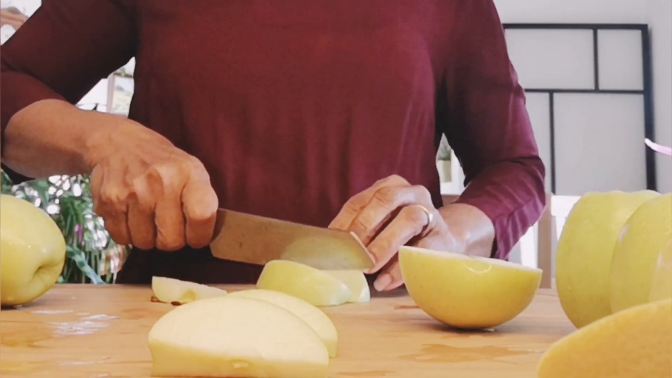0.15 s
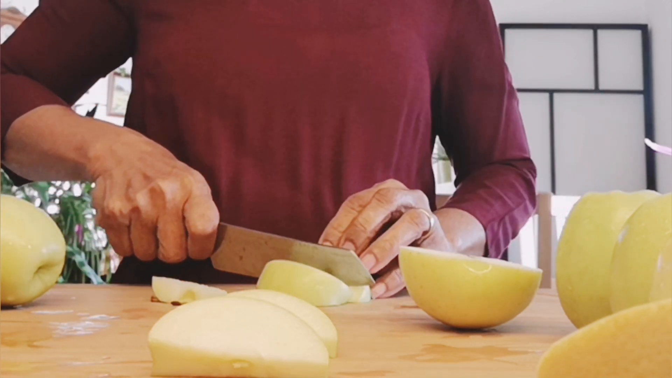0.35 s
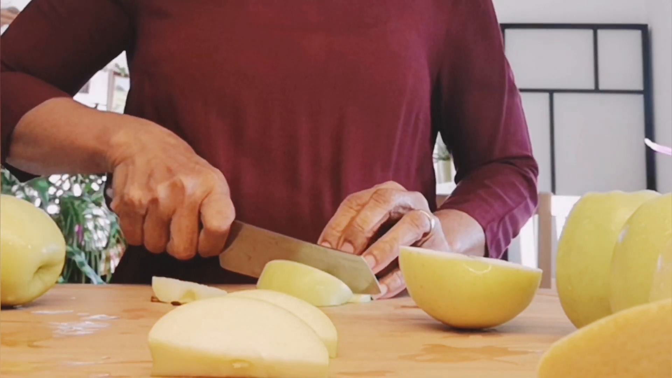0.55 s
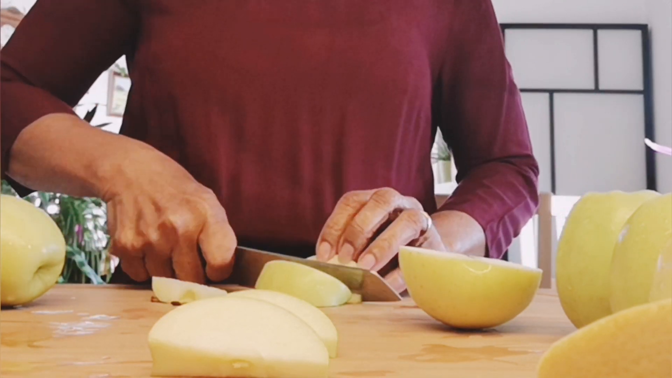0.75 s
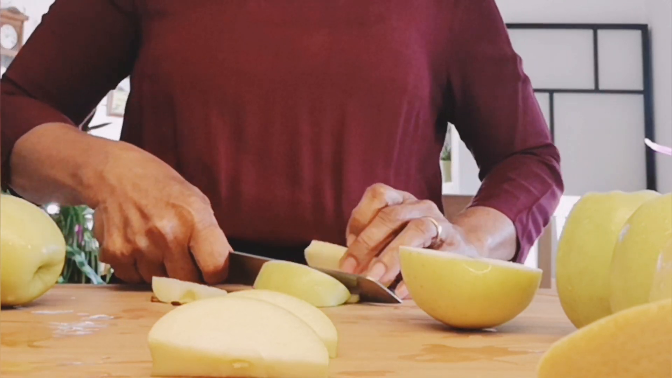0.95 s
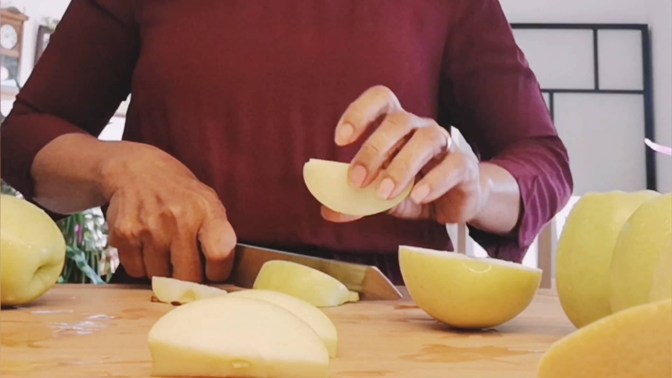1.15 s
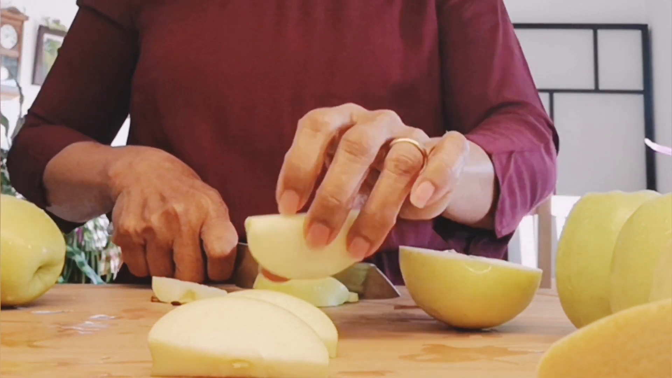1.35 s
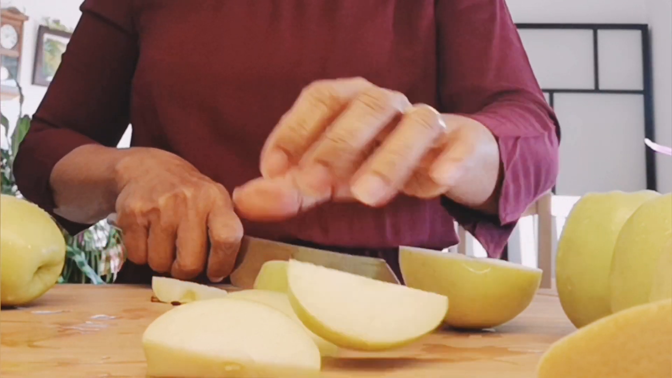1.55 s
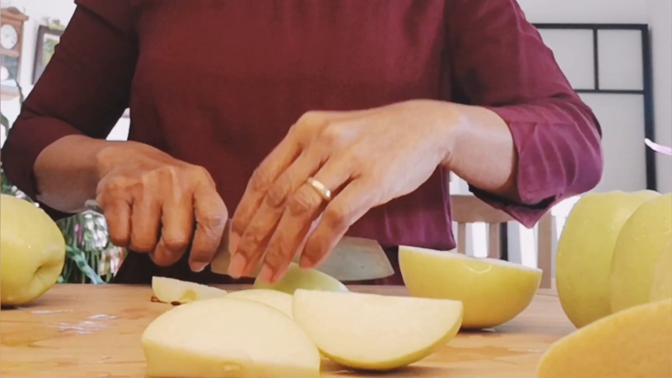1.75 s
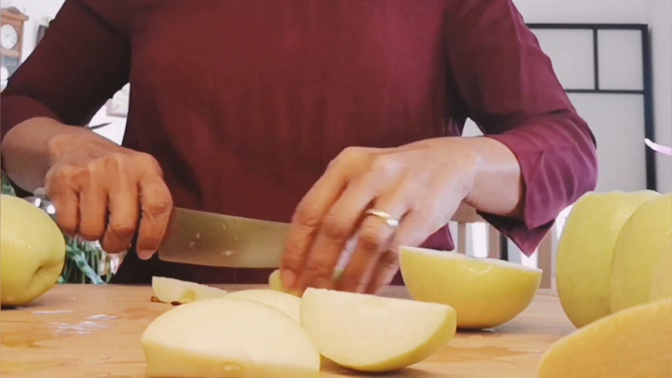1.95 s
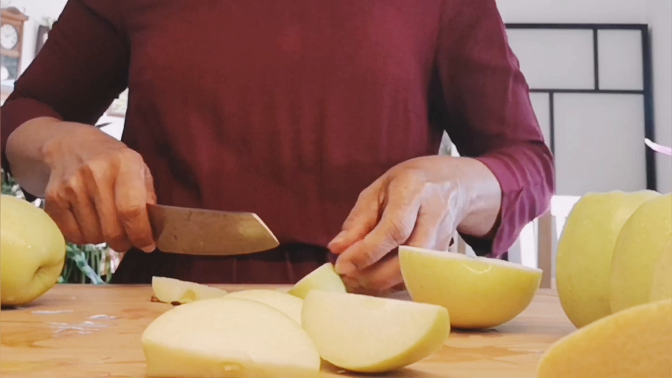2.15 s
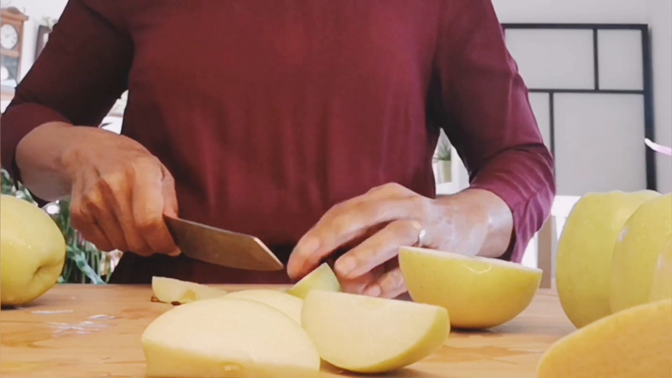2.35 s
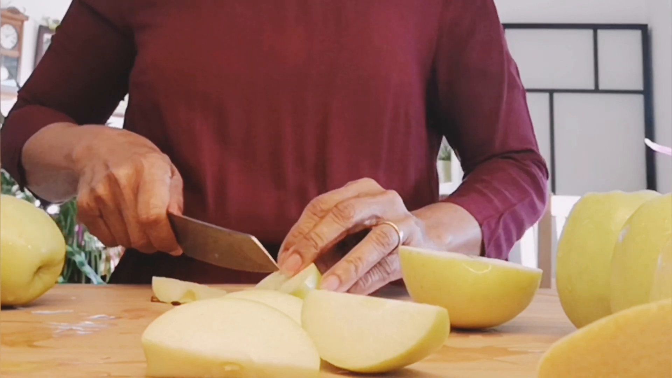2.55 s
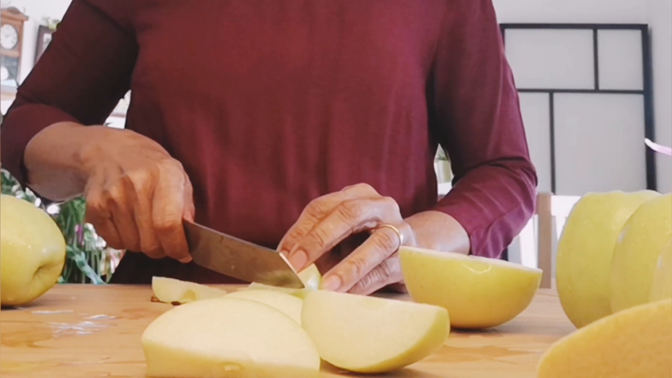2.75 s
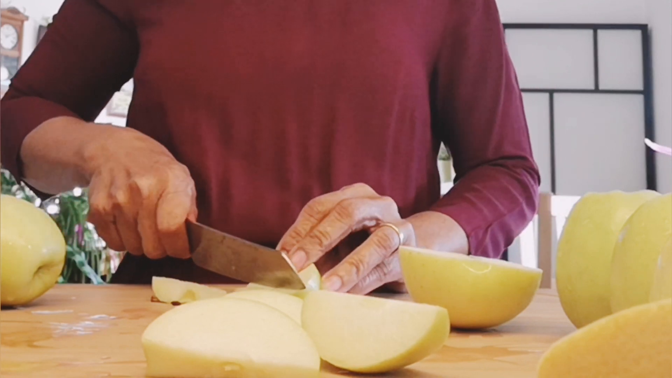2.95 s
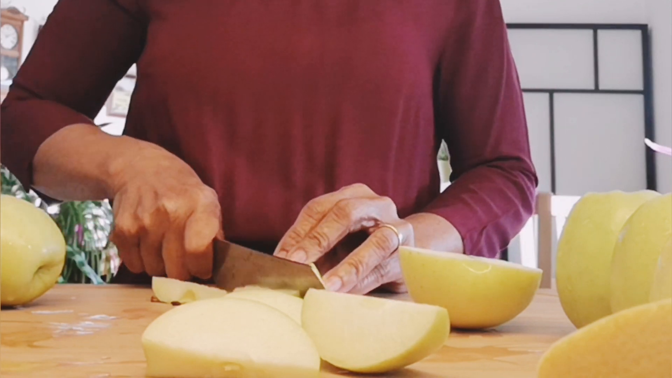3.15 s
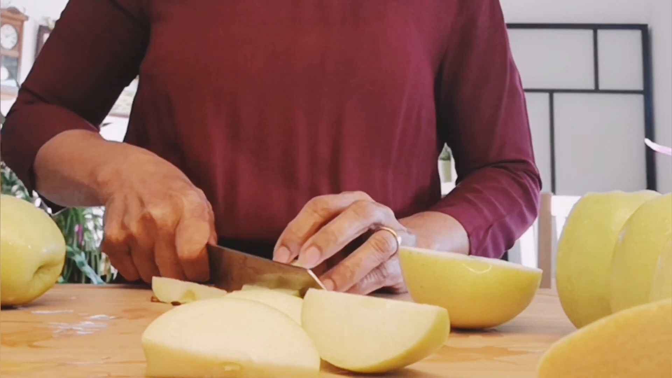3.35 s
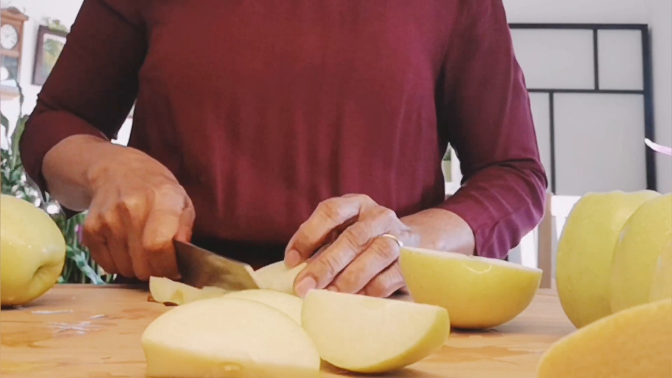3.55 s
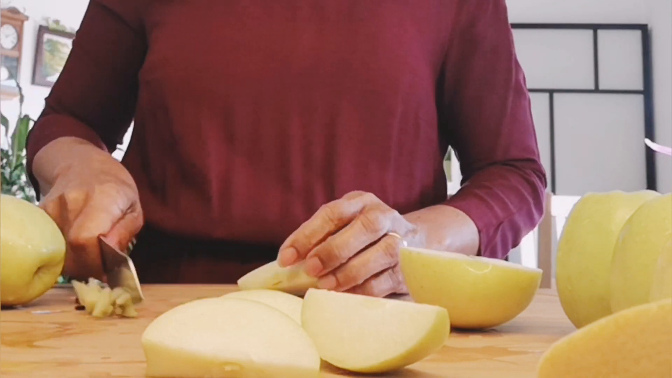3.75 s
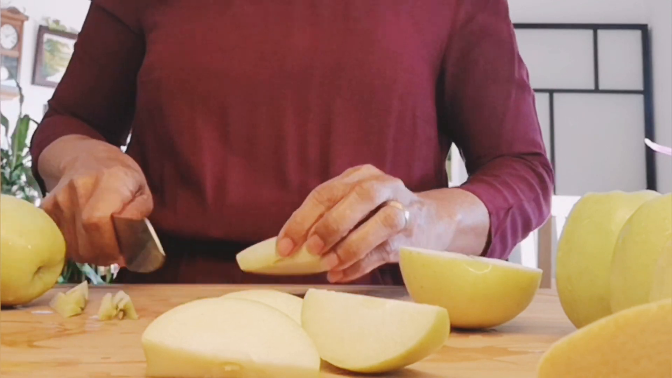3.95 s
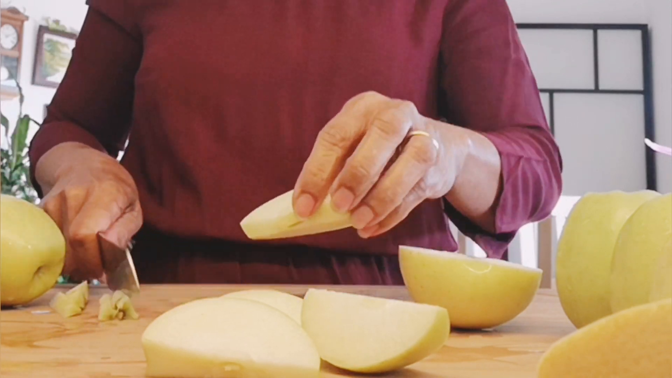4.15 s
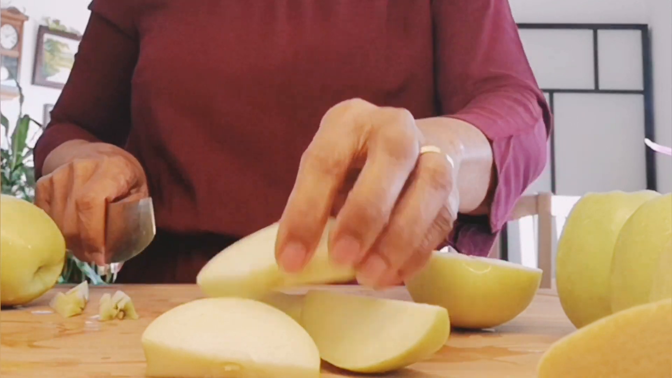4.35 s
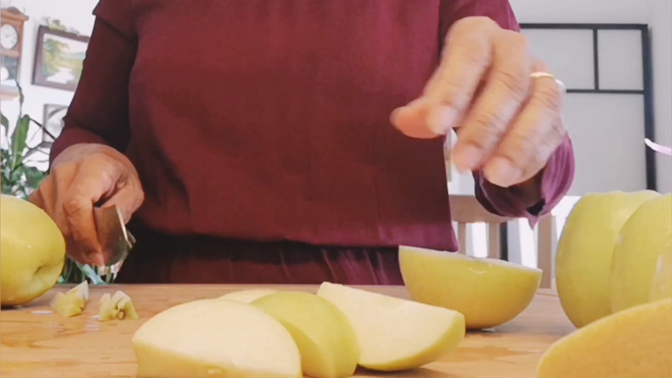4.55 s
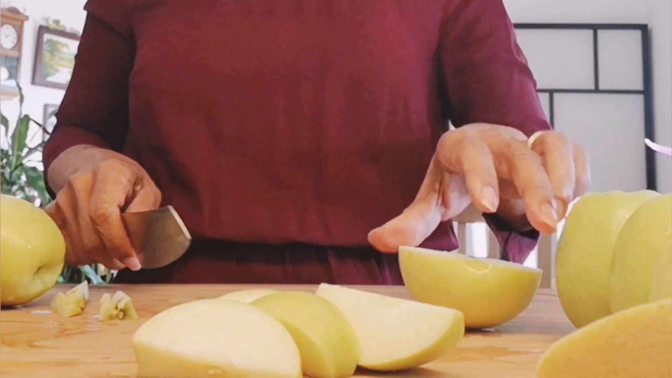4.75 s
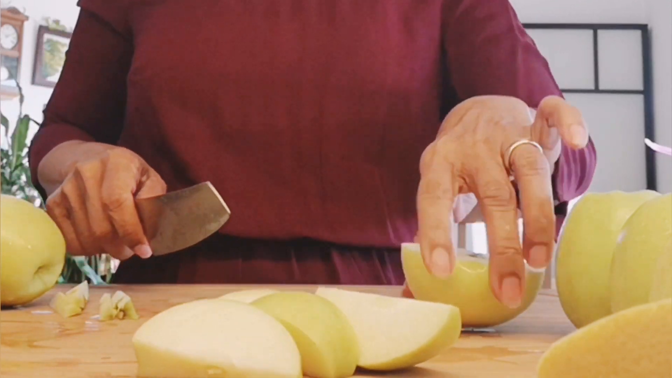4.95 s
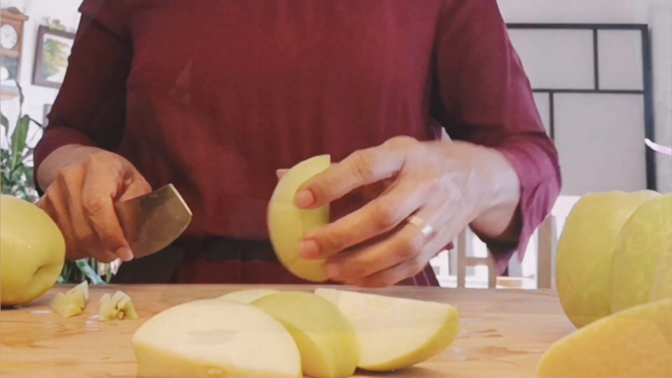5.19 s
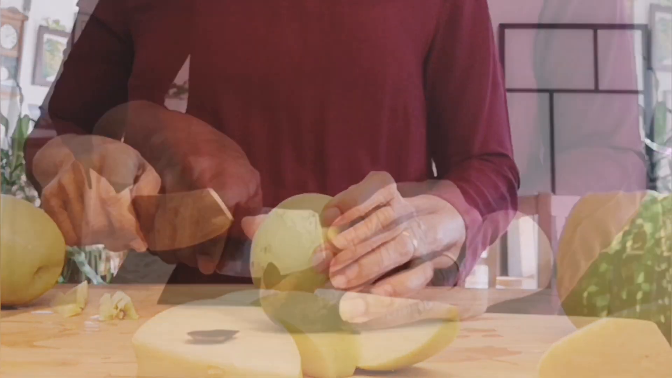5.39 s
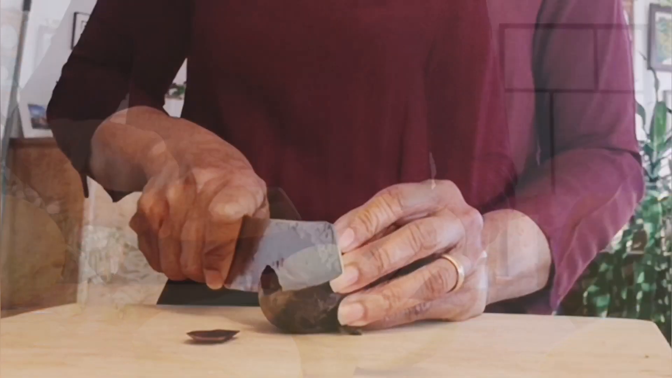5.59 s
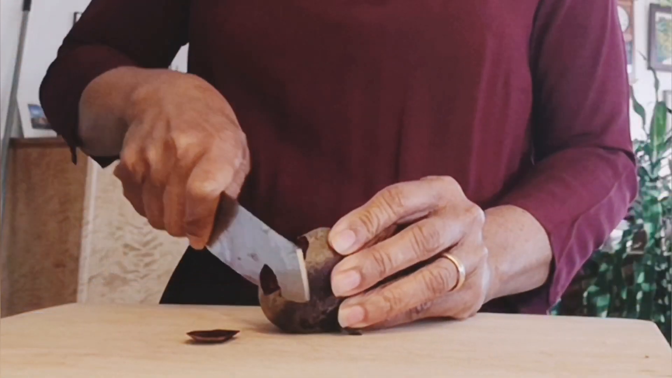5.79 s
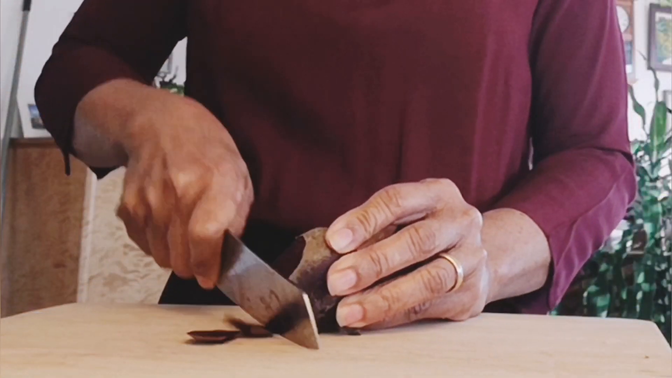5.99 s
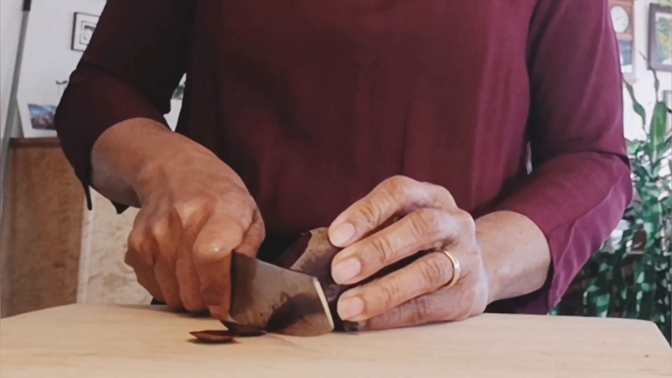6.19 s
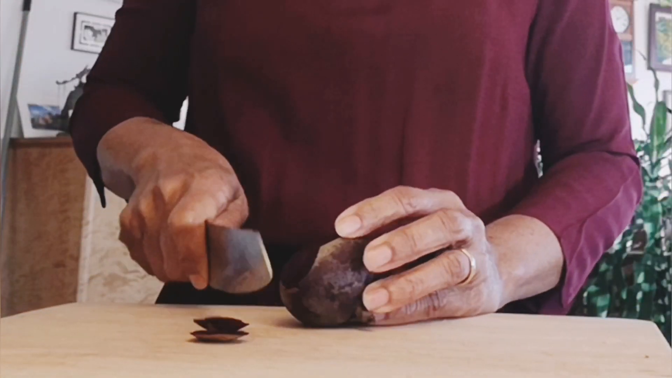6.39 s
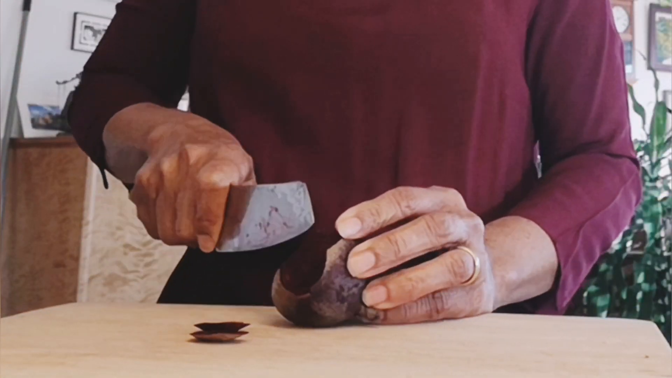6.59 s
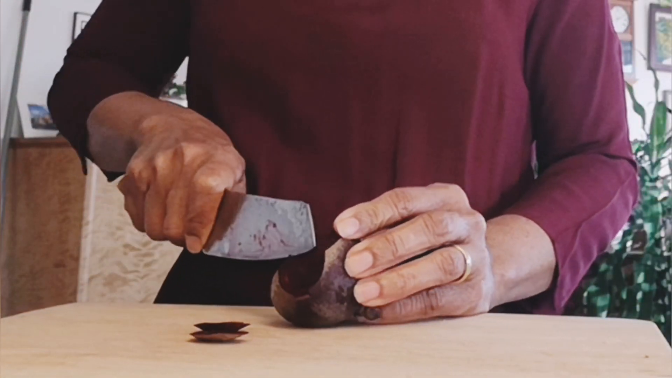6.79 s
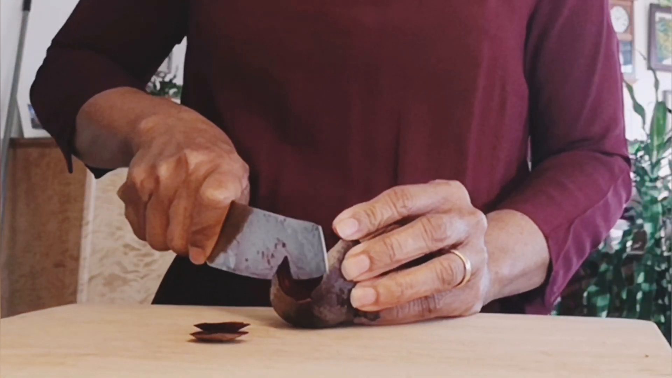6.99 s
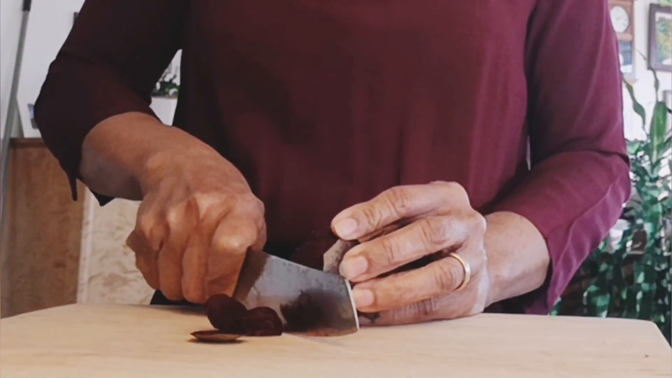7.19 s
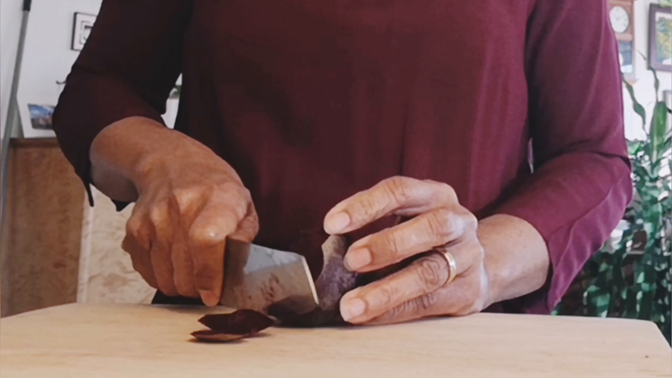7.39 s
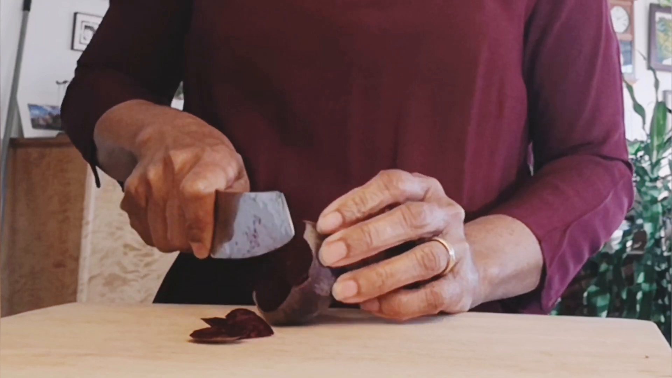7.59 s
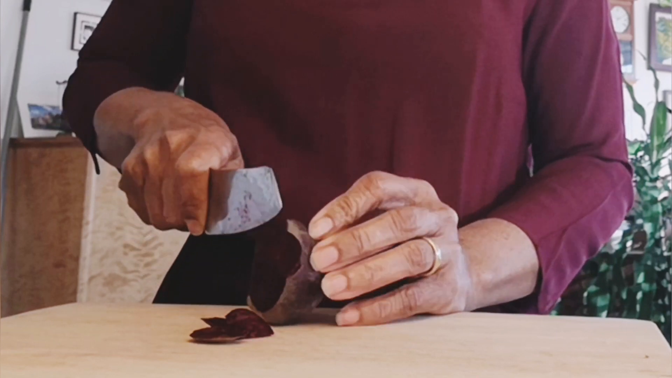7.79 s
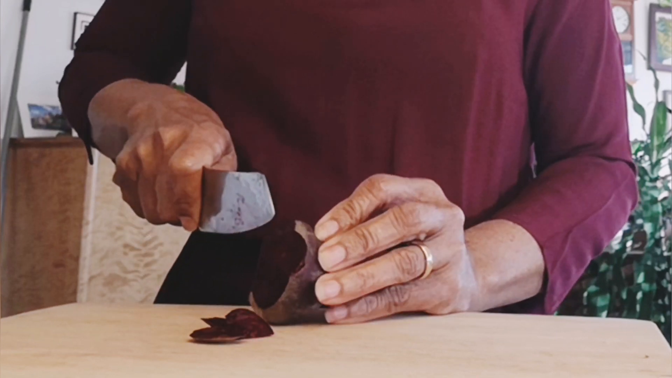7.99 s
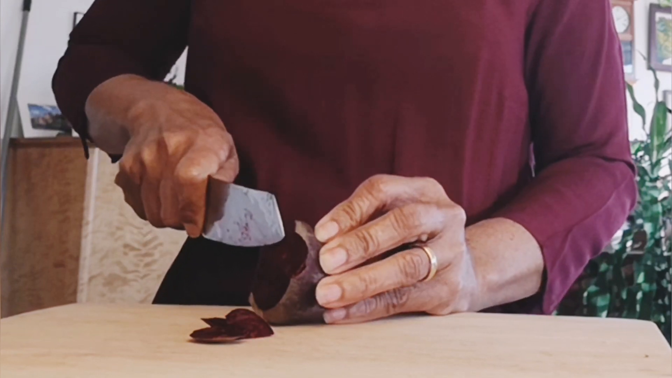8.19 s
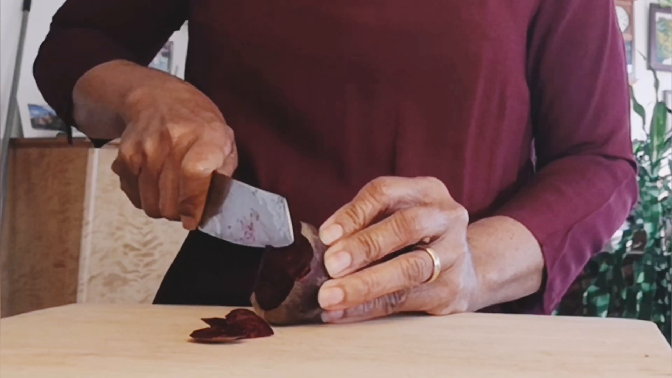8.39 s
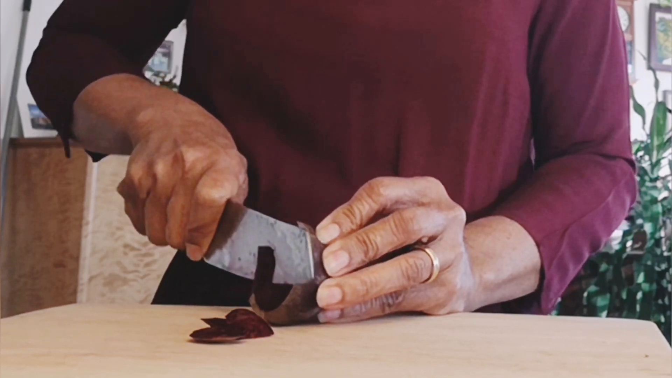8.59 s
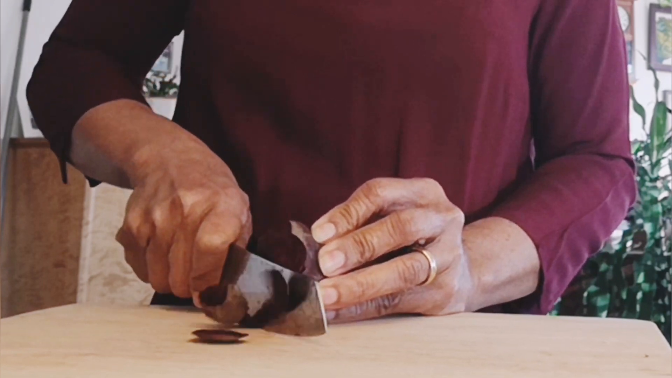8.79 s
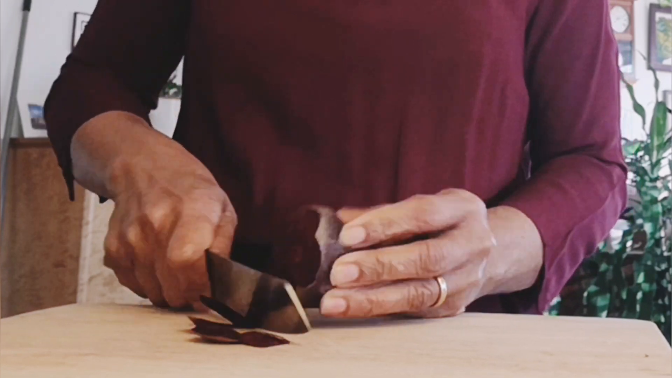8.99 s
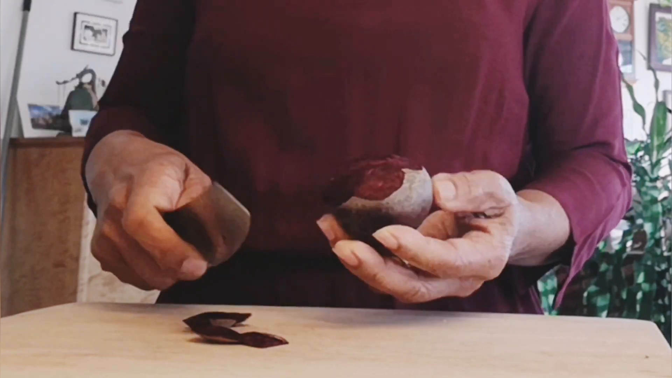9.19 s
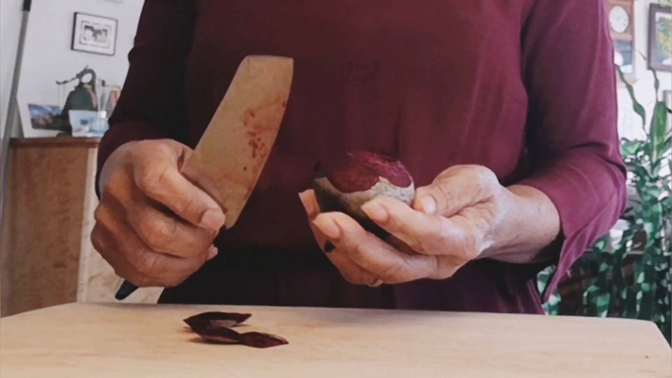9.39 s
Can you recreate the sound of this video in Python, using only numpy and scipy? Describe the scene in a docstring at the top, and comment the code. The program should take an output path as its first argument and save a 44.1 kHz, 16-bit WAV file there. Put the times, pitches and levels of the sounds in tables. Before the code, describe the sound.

Apple slicing comes first: a juicy crackling cut, a double knock on wood, a cluster of dull wobbling bumps as the slice is set down, light scrapes, then another cut with a loud crack. After small knocks and a put-down thud, the work moves to a beet, with three spaced paring strokes and firm, brighter clacks. Two close microphones catch short room echo, soft low air noise and a faint high whine.

```python
"""Apple and beet on two wooden boards

Indoors in a quiet kitchen, close to the work: an apple is sliced, then a beet is pared on another board.
The blade hisses as a crackle of bursting cells, and each cut swells toward the board.
Knocks, snaps, bumps and light touches are short rings of shaped noise; boards, blade and table add modes.
Two spaced microphones hear room echo, air noise, a low hum and a faint electric whine of falling chirps;
a compressor holds the hardest knocks."""
import sys
import numpy as np
from scipy import signal
from scipy.fft import rfft, irfft
from scipy.io import wavfile
from scipy.ndimage import uniform_filter1d, minimum_filter1d

SR = 44100
rng = np.random.default_rng(int(sys.argv[2]) if len(sys.argv) > 2 else 0)


def dump_mix(stems):
    """Bounce the given channels to the path in sys.argv[1] as a 16-bit WAV at rate SR."""
    frames = np.atleast_2d(stems).T  # one column per channel
    limited = np.clip(frames, -1, 1)  # hard clip at full scale
    pcm = np.round(limited * 32767).astype(np.int16)
    wavfile.write(sys.argv[1], SR, pcm)


N = 416304
TIME = np.arange(N) / SR  # seconds
HZ = np.fft.rfftfreq(8192, 1 / SR)  # frequency axis of a single blow
MOVE_S = 5.5  # the work moves from the apple board to the beet board

# the edge pushed through the fruit; end levels are before the layer gains:
# [start_s, length_s, end_hiss_db, end_judder_db, swell_db]
CUTS = [(0.482, 0.231, -45, -38, 31), (3.06, .172, -50, -44, 26.5), (4.489, 0.077, -59.5, -37, 14.5),
        (5.995, .1, -58.5, -46.5, 19), (6.993, .26, -62.5, -40, 12), (8.577, 0.34, -55, -37, 6.5)]
BITE_S, CUT_EDGE_S = 0.058, 0.01  # fades as the edge enters the skin and as the cut stops
SWELL_POWER = 1.9  # the level in dB climbs as this power of the way through
# the blade dragged over wood or fruit; levels are before the layer gains:
# [middle_s, length_s, hiss_db, judder_db]
SCRAPES = [(2.061, 0.22, -60, -51), (2.244, 0.088, -67.5, -67), (2.4, 0.081, -76, -69.5),
           (2.599, 0.29, -73.5, -68), (3.571, 0.057, -51, -52.5), (3.8, .2, -74.5, -74),
           (4.247, 0.15, -59.5, -40.5), (5.924, 0.14, -77.5, -66), (6.346, 0.21, -58.5, -48.5),
           (7.076, 0.071, -67, -38), (8.696, 0.097, -61.5, -36)]
SCRAPE_ARCH = 1.5  # level follows blade speed, half a sine, to this power
CELLS_PER_S, CELL_SPREAD_DB = 3500, 1.9  # rate of bursting cells, mean of their exponential spread
# crackle of the flesh: [pitch_hz, density_db]
FLESH = [(200, -15.5), (700, 2), (1250, 0.5), (2000, 4), (3200, 0.5), (4800, 0), (6200, -3), (7200, 3.5),
         (7900, -6.5), (8600, -12.5), (10000, -22), (11500, -19), (15000, -23)]
# low shaking of the board under the drag: [pitch_hz, density_db]
JUDDER = [(40, -22.5), (100, -7), (165, 10), (210, -10.5), (280, -19), (360, -5), (500, -13), (650, -33.5),
          (2000, -75)]
# band in which the apple board hums under the blade: [pitch_hz, density_db]
PRESSED_BOARD = [(900, -25), (1150, -1), (1300, 1), (1550, -6), (1900, -31)]
# modes of the free blade: [pitch_hz, level_db, t60_s]
BLADE = [(7500, -3.5, 0.01), (7620, -3.5, 0.11), (8090, 2.5, 0.032), (7500, -7, 0.024)]
# modes of the blade while it drags: [pitch_hz, level_db, t60_s]
DRAGGED_BLADE = [(1110, 6.5, 0.019), (1427, 4, 0.018), (3040, -1.5, 0.018), (3400, -1.5, 0.019),
                 (5270, -4.5, .02), (5960, -15, .02), (7580, -6.5, 0.06)]

# blade meets board; the thump is relative to the clack, before it is halved; + is left:
# [start_s, force_db, hardness_corner_hz, thump_db, left_right_db]
KNOCKS = [(0.7122, -11.5, 1300, -1, -2), (0.7352, -13.5, 1450, -6, 0), (3.2289, -23, 1900, 6.5, -2),
          (3.2727, 8.5, 1950, -16, 0), (4.052, -44.5, 1570, 10, 0.5), (4.1934, -12.5, 1790, -1.5, 1),
          (4.5855, -21, 910, -4, -2), (6.0946, 3.5, 4100, -16.5, 3), (6.227, -26, 3900, 14, -2),
          (7.2552, 6, 2650, -9.5, 1.5), (8.362, -45, 1890, 15, 5.5), (8.857, 1, 2450, -3, 2.5)]
# clack on either board: [pitch_hz, density_db]
APPLE_BOARD = [(60, -38), (250, -20.5), (400, -7), (620, -11), (760, -7.5), (900, -8), (1080, 2),
               (1280, 1.5), (1650, -7), (2500, -1.5), (3200, -5), (4200, -10.5), (7500, 0), (10000, -19)]
BEET_BOARD = [(60, -51.5), (320, -14.5), (520, -12), (700, -5.5), (950, 2), (1160, -0.5), (1350, -5),
              (1650, -3), (1900, -4.5), (2350, -7.5), (3550, -10.5), (4100, -22), (7500, -12.5),
              (10000, -15)]
# thump of the table under a knock: [pitch_hz, density_db]
THUMP = [(30, -37), (80, -11.5), (130, 2), (185, 0), (260, -20.5), (500, -23), (2000, -65)]
# modes of the two boards: [pitch_hz, level_db, t60_s]
APPLE_MODES = [(295, -6.5, 0.081), (428, -6, 0.057), (540, -10, 0.039), (682, -2.5, 0.1), (877.5, 0, 0.12),
               (1215, -1, .05), (1381.5, -3, 0.045), (1997, -3.5, .05), (3022, -7, .05)]
BEET_MODES = [(424, -10.5, 0.12), (485, -25, .08), (645, -5.5, 0.14), (910, -4.5, 0.066),
              (1183, 24.5, 0.0097), (1938, 4.5, 0.076), (2460, 19, 0.033), (2864, 6, 0.11),
              (2980, -14, 0.16), (3690, 2.5, 0.074)]

# skin and fibres snap: [start_s, level_db, t60_s, brightness_corner_hz, left_right_db]
SNAPS = [(0.734, -16.5, 0.022, 6040, 0), (3.2275, -22.5, 0.11, 12000, -2), (3.2553, -27, 0.039, 9000, -6.5),
         (3.2595, -11.5, 0.01, 12900, 9), (4.196, -31.5, 0.12, 6500, 2), (6.095, -24.5, .02, 7500, -2),
         (6.161, -47, .01, 12000, -4), (7.254, -12, .02, 5560, -1.5), (8.588, -39.5, 0.04, 12900, 0)]
# crack of the skin: [pitch_hz, density_db]
SNAP = [(200, -12.5), (1300, -4), (2500, -6.5), (3800, -7), (5200, -4.5), (6300, -9), (7300, 4.5),
        (8000, 0.5), (9000, -19.5), (11000, -22.5), (15000, -29)]
# the steel blade is flicked and sings: [start_s, level_db]
PINGS = [(3.259, -33.5), (4.194, -46), (4.211, -40.5)]

# fruit bumps and wobbles on the wood; the wet tick is relative to the thud:
# [start_s, level_db, softness_corner_hz, tick_db]
BUMPS = [(0.265, -45.5, 400, -30), (.415, -28, 133, -41), (1.594, -36, 402, -9), (1.635, -24, 390, -14.5),
         (1.695, -27, 387, -11.5), (1.727, -24, 404, -5.5), (1.775, -29, 378, -9.5), (1.794, -42, 367, -14),
         (1.812, -38, 370, -10), (1.941, -29, 258, -2.5), (4.531, -29, 272, -24), (4.586, -24.5, 480, -5),
         (5.397, -25, 105, -22), (5.667, -35.5, 303, -20.5), (5.698, -38.5, 260.3, -24.5),
         (8.485, -42, 280, -22.5), (9.147, -37, 141.8, -27.5)]
# thud of the fruit: [pitch_hz, density_db]
FRUIT = [(30, -32), (80, -4.5), (140, -0.5), (210, -1), (260, -6.5), (320, 5), (430, -0.5), (700, -21),
         (1200, 5), (3000, -13.5), (9000, -21)]
# wet tick of the flesh: [pitch_hz, density_db]
TICK = [(200, -13.5), (700, -5.5), (1200, 9), (1550, -1), (2000, -4.5), (2500, -3.5), (3100, -8),
        (4200, -14), (5200, -17.5), (6400, -20.5), (7800, -13), (9000, -47), (15000, -28)]
# a slice is put down and the table rings under it: [start_s, level_db]
SET_DOWN = (4.586, -42.5)
# modes of the table: [pitch_hz, level_db, t60_s]
TABLE_MODES = [(371, -6, 0.16), (472, -6, 0.21), (624, -5, .25), (840, 4, 0.29), (926, -1, 0.27),
               (1039, -10, .28)]

# the tip of the blade touches lightly: [start_s, level_db]
TOUCHES = [(.413, -57.5), (1.9378, -47), (1.957, -36), (6.224, -39.5), (6.403, -34.5), (6.844, -56),
           (7.06, -35), (8.212, -54), (8.484, -53.5), (9.133, -31.5)]
# click of the tip: [pitch_hz, density_db]
TOUCH = [(200, -7.5), (800, 4), (1300, -2), (2200, 4), (2900, -3.5), (3700, -5.5), (5000, -13.5),
         (7400, -10.5), (9000, -28), (15000, -44)]

# power supply chirps, one in each half wave of the mains; place is 0-1 within the half wave:
# [start_s, end_s, pitch_hz, place, length_s, left_db, right_db]
WHINE = [(0, 5.5, 14750, .36, .002, -86, -83), (0, 5.5, 13560, .58, .0022, -82.5, -78),
         (5.5, 9.9, 13600, .5, .003, -81.5, -70)]
HALF_WAVES_PER_S, WHINE_FADE_S = 100, 0.5
CHIRP_FALL_HZ_PER_S, CHIRP_JITTER_HZ = 300000, 170
# faint hiss around the whine: [pitch_hz, density_db]
FIZZ = [(9000, -39.5), (12000, -6), (14000, 0), (15600, -3), (17000, -30.5)]
FIZZ_DB = -88  # rms

# low room noise: [pitch_hz, density_db]
AIR = [(12, -55), (20, -21.5), (76, -5), (108, -14.5), (137, 1), (189, -9.5), (211, -17.5), (291, -26),
       (401, -25.5), (666, -36.5), (783, -29), (1050, -32.5), (1700, -30.5), (5980, -46), (12000, -52.5),
       (15600, -85.5), (22000, -120)]
AIR_DB = -58  # rms
# steady hum: [pitch_hz, rms_db]
HUM = [(86, -70.5), (134.6, -71), (154, -75)]

# decay of the room: [pitch_hz, t60_s]
ROOM = [(100, 0.61), (200, 0.45), (500, 0.44), (1200, 0.46), (2500, .48), (5000, 0.43), (8000, 0.47),
        (15000, 0.36)]
# tone of the room echo: [pitch_hz, gain_db]
ROOM_COLOUR = [(40, 9), (100, 1.5), (160, 3.5), (280, 3.5), (500, 4), (1000, -2.5), (2500, 0.5),
               (5000, -2.5), (8000, -2.5), (15000, 2)]
# likeness of diffuse sound at the two microphones: [pitch_hz, correlation -1 to 1]
LIKENESS = [(60, .99), (140, 1), (200, .94), (300, 0.015), (420, 0.594), (640, -.38), (1200, -0.2),
            (15000, 0.3)]
WORK_ECHO_DB, WHINE_ECHO_DB = -5.5, -5  # sends to the room
CEILING_DB, EDGE_HZ = -0.2, 15700  # limiter ceiling, top of the recorded band


def slicing():
    """Cells burst under the moving edge in a fine crackle that rings the blade; the drag shakes the board."""
    cut, cut_judder = pushing()
    scrape, scrape_judder = dragging()
    spread_db = CELL_SPREAD_DB * np.minimum(rng.exponential(1, N), 4)
    cells = (rng.random(N) < CELLS_PER_S / SR) * amp(spread_db)
    bursts = (cells + 0.18) * rng.standard_normal((2, N))  # a thin steady hiss lies under the bursts
    crackle = shifting(coloured(bursts, FLESH), patchy_db=2.5)
    steel = evened(signal.oaconvolve(bursts, ringing(BLADE), axes=1)[:, :N])
    rasp = evened(signal.oaconvolve(bursts, ringing(DRAGGED_BLADE), axes=1)[:, :N])
    judder = coloured(diffuse(rng.standard_normal((2, N))), JUDDER)
    # the wet apple presses the blade to the board, which hums along in a band of its own
    wood = (TIME < MOVE_S) * coloured(bursts, PRESSED_BOARD)
    cutting = cut * (amp(6) * crackle + amp(-3.5) * steel + amp(-5) * rasp + amp(3) * wood)
    scraping = scrape * (amp(2.5) * crackle + amp(2.0) * rasp)
    return cutting + scraping + amp(-3.5) * (cut_judder + scrape_judder) * judder


def pushing():
    """Hiss and judder levels of the cuts: each swells as the blade sinks in, and stops as it comes through."""
    levels = np.zeros((2, N))
    for s, length, hiss_db, judder_db, swell_db in CUTS:
        way = np.clip((TIME - s) / length, 0, 1)
        entering = (TIME - s) / BITE_S
        leaving = (s + length - TIME) / CUT_EDGE_S
        inside = np.clip(np.minimum(entering, leaving) + 0.5, 0, 1)
        swell = amp(swell_db * (way ** SWELL_POWER - 1))
        levels += amp([[hiss_db], [judder_db]]) * inside * swell
    return levels


def dragging():
    """Hiss and judder levels of the scrapes: each follows the speed of the blade, up and down again."""
    levels = np.zeros((2, N))
    for s, length, hiss_db, judder_db in SCRAPES:
        speed = np.sin(np.pi * np.arange(0, length, 1 / SR) / length)
        add(levels, s - length / 2, amp([[hiss_db], [judder_db]]) * abs(speed) ** SCRAPE_ARCH)
    return levels


def shifting(x, patchy_db):
    """The colour drifts in patches, patchy_db rms, as the point of contact moves."""
    z = signal.stft(x, nperseg=512)[2]
    patches = uniform_filter1d(rng.standard_normal(z.shape[1:]), size=5, axis=0)  # across frequency
    patches = uniform_filter1d(patches, size=16, axis=1)  # along time
    patched = z * amp(patchy_db * evened(patches))
    return evened(signal.istft(patched, nperseg=512)[1][:, :N])


def knocks():
    """The edge hits the board: a clack and a thump of the table; then its ring and scatter off things close by."""
    struck, scatter = np.zeros((2, 2, N))
    for s, db, corner_hz, thump_db, pan_db in KNOCKS:
        wood = read(APPLE_BOARD if s < MOVE_S else BEET_BOARD, HZ) + softened(corner_hz, steep=10)
        clack = blow(wood, t60=0.016, apart=0.36, pan_db=pan_db)
        thump = amp(thump_db) * blow(read(THUMP, HZ), t60=0.033, apart=0.17) / 2
        add(struck, s, amp(db) * (clack + thump))
        scattered = amp(2.5) * blow(wood, t60=0.033, apart=1.8, pan_db=pan_db)
        add(scatter, s + 0.001, amp(db) * scattered)
        add(scatter, s, amp(db) * amp(-20.5) * board(s, corner_hz))
    return struck, scatter


def snaps():
    """The skin gives way in a bright crack; the flicked blade rings briefly in its modes."""
    out = np.zeros((2, N))
    for s, db, t60, corner_hz, pan_db in SNAPS:
        crack_db = read(SNAP, HZ) + softened(corner_hz, steep=14)
        add(out, s, amp(db) * blow(crack_db, t60, apart=1.0, pan_db=pan_db))
    for s, db in PINGS:
        add(out, s, amp(db) * ringing(BLADE))
    return out


def bumps():
    """Soft flesh lands on wood: a dull thud with a small wet tick, both of which ring the board."""
    out = np.zeros((2, N))
    for s, db, corner_hz, tick_db in BUMPS:
        thud = blow(read(FRUIT, HZ) + softened(corner_hz, steep=8), t60=0.062, apart=0.028)
        tick = amp(tick_db) * blow(read(TICK, HZ), t60=0.043, apart=0.956)
        add(out, s, amp(db) * (thud + tick))
        thud_ring = amp(-8) * board(s, corner_hz)
        tick_ring = amp(tick_db) * amp(-16.5) * board(s, corner_hz=3514)
        add(out, s, amp(db) * (thud_ring + tick_ring))
    down_s, down_db = SET_DOWN
    add(out, down_s, amp(down_db) * ringing(TABLE_MODES))
    return out


def touches():
    """The tip meets the wood without weight: a thin, short click."""
    out = np.zeros((2, N))
    for s, db in TOUCHES:
        add(out, s, amp(db) * blow(read(TOUCH, HZ), t60=0.03, apart=0.98, pan_db=1))
    return out


def board(s, corner_hz):
    """The board in use at time s rings; a soft blow wakes only its low modes."""
    modes = APPLE_MODES if s < MOVE_S else BEET_MODES
    return ringing([(hz, db - 10 * np.log10(1 + (hz / corner_hz) ** 6), t60) for hz, db, t60 in modes])


def ringing(modes):
    """Dying modes, met in a different phase by each microphone."""
    t = np.arange(SR // 4) / SR
    turns = rng.random((len(modes), 2, 1))
    rise = np.minimum(t * 2000, 1)  # half a millisecond
    out = np.zeros((2, len(t)))
    for (hz, db, t60), turn in zip(modes, turns):
        out += amp(db - 60 * t / t60) * np.sin(2 * np.pi * (hz * t + turn))
    return rise * out


def blow(db, t60, apart, pan_db=0):
    """A dense ring of spectrum db, with the energy of one millisecond at full scale before panning."""
    t = np.arange(2 * len(HZ) - 2) / SR
    noise = rng.standard_normal((3, len(t)))
    # each microphone has its own noise, scaled by apart, and a shared one
    z = rfft((noise[:2] * apart + noise[2]) * amp(-60 * t / t60))
    z /= np.sqrt(uniform_filter1d(abs(z) ** 2, size=40, axis=1))  # level the spectrum
    burst = irfft(z) * (t < t[-1] / 2)
    fade = np.minimum(2 - 2 * t / t[-1], 1)
    ring = irfft(rfft(burst) * causal(db)) * fade
    loudness = np.sqrt(2e-3 * SR / np.sum(ring ** 2))  # both channels together: 2 ms
    return ring * loudness * amp([[pan_db / 2], [-pan_db / 2]])


def softened(corner_hz, steep):
    """A blow of finite length loses the treble above its corner (dB)."""
    return -10 * np.log10(1 + (HZ / corner_hz) ** steep)


def causal(db):
    """The minimum-phase spectrum: the promptest ring that has this gain."""
    log_gain = np.log(amp(np.maximum(db, db.max() - 100)))
    circle = np.r_[log_gain, log_gain[-2:0:-1]]
    return np.exp(np.conj(signal.hilbert(circle)))[:len(db)]


def whine():
    """A power supply whistles in short falling chirps, a hundred times a second, over a faint hiss."""
    out = amp(FIZZ_DB) * coloured(rng.standard_normal((2, N)), FIZZ)
    for start, end, hz, place, length, left_db, right_db in WHINE:
        t = (TIME * HALF_WAVES_PER_S % 1 - place) / HALF_WAVES_PER_S  # seconds from the chirp's middle
        wander = np.cumsum(CHIRP_JITTER_HZ * rng.standard_normal((2, N)), axis=1) / SR
        turns = (hz - CHIRP_FALL_HZ_PER_S * t / 2) * t + wander
        chirp = np.exp(-(2 * t / length) ** 2) * np.sin(2 * np.pi * turns)
        on = np.clip(np.minimum(TIME - start, end - TIME) / WHINE_FADE_S + 0.5, 0, 1)
        out += on * amp([[left_db], [right_db]]) * evened(chirp)
    return out


def background():
    """Low room noise, and the hum of an appliance whose tones waver slowly in pitch."""
    out = amp(AIR_DB) * coloured(diffuse(rng.standard_normal((2, N))), AIR)
    waver = evened(uniform_filter1d(rng.standard_normal((len(HUM), N)), size=12000, axis=1))
    for (hz, db), drift in zip(HUM, waver):
        turns = np.cumsum(hz + 3.1 * drift) / SR  # 3.1 Hz rms
        out += amp(db) * np.sqrt(2) * np.sin(2 * np.pi * turns)
    return out


def kitchen(x):
    """Dense echoes of walls and cupboards that build up, then die band by band."""
    hz, t, z = signal.stft(diffuse(rng.standard_normal((2, SR))), SR, nperseg=512)
    z = z * amp(-60 * t / read(ROOM, hz)[:, None])
    build_up = np.clip((TIME[:SR] - 0.003) / 0.0024, 0, 1)
    tail = signal.istft(z, SR, nperseg=512)[1][:, :SR] * build_up
    z = rfft(tail)
    z /= np.sqrt(uniform_filter1d((abs(z) ** 2).mean(0), size=60))  # level before colouring
    tail = irfft(z * amp(read(ROOM_COLOUR, np.fft.rfftfreq(SR, 1 / SR))))[:, :SR * 3 // 4]
    return signal.fftconvolve(x, tail, axes=1)[:, :N]


def diffuse(pair):
    """Two unrelated signals become one diffuse field, as alike at the microphones as LIKENESS says."""
    size = pair.shape[1]
    a, b = rfft(pair)
    same = np.clip(read(LIKENESS, np.fft.rfftfreq(size, 1 / SR)), -1, 1)
    mid, side = a * np.sqrt((1 + same) / 2), b * np.sqrt((1 - same) / 2)
    return irfft([mid + side, mid - side], size)


def coloured(x, points):
    """Gives x a spectrum, at an rms of one."""
    size = x.shape[-1]
    gain = amp(read(points, np.fft.rfftfreq(size, 1 / SR)))
    return evened(irfft(rfft(x) * gain, size))


def read(points, hz):
    """Joins (Hz, value) points on a log-frequency axis."""
    f, value = np.transpose(points)
    return np.interp(np.log(hz + 1), np.log(f + 1), value)


def evened(x):
    """Scales to an rms of one."""
    return x / np.sqrt(np.mean(x ** 2) + 1e-20)


def amp(db):
    """Decibels to gain."""
    return 10 ** (np.asarray(db) / 20)


def add(mix, s, sound):
    """Mixes a two-row sound in at time s, cut off at the end of the mix."""
    part = mix[:, round(s * SR):][:, :sound.shape[1]]
    part += sound[:, :part.shape[1]]


def scene():
    """The work on the boards, its echo and the background."""
    struck, scatter = knocks()
    work = struck + bumps() + touches() + snaps() + slicing()
    whistle = whine()
    left, right = work + scatter
    # the second board stands nearer the left microphone, so the right hears it 26 samples later
    near = np.array([left, np.where(TIME < MOVE_S, right, np.roll(right, 26))])
    echo = kitchen(amp(WORK_ECHO_DB) * work + amp(WHINE_ECHO_DB) * whistle)
    return near + whistle + echo + background()


def record(dry, threshold_db=-22, squeeze=0.59, attack_s=0.0014, release_s=0.11):
    """A compressor ducks just after a hard knock and lets its echo swell back; a peak limiter; the band limit."""
    power = np.maximum(uniform_filter1d((dry ** 2).mean(0), size=130), 1e-12)
    over_db = np.maximum(10 * np.log10(power) - threshold_db, 1e-6)
    # hold each peak, then let the excess in dB die away exponentially
    duck_db = np.exp(np.maximum.accumulate(np.log(over_db) + TIME / release_s) - TIME / release_s)
    lag = np.exp(-1 / (attack_s * SR))
    smooth_db = signal.lfilter([1 - lag], [1, -lag], duck_db)
    squeezed = dry * amp(-squeeze * smooth_db)
    headroom = np.minimum(amp(CEILING_DB) / (abs(squeezed).max(0) + 1e-9), 1)
    limited = squeezed * uniform_filter1d(minimum_filter1d(headroom, size=90), size=90)
    lowpass = signal.firwin(511, EDGE_HZ, window=("kaiser", 9), fs=SR)
    return signal.oaconvolve(limited, lowpass[None], "same")


dry = scene()
out = record(dry)
dump_mix(out)
```